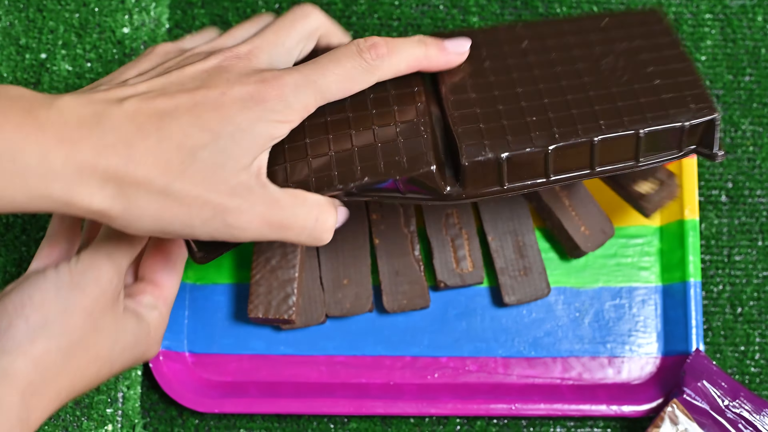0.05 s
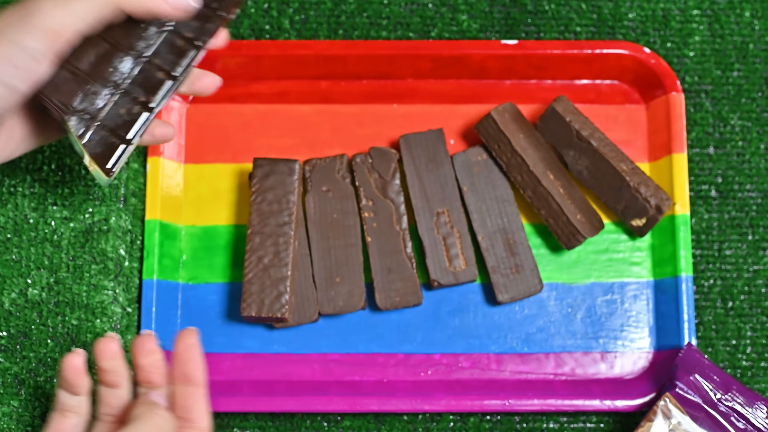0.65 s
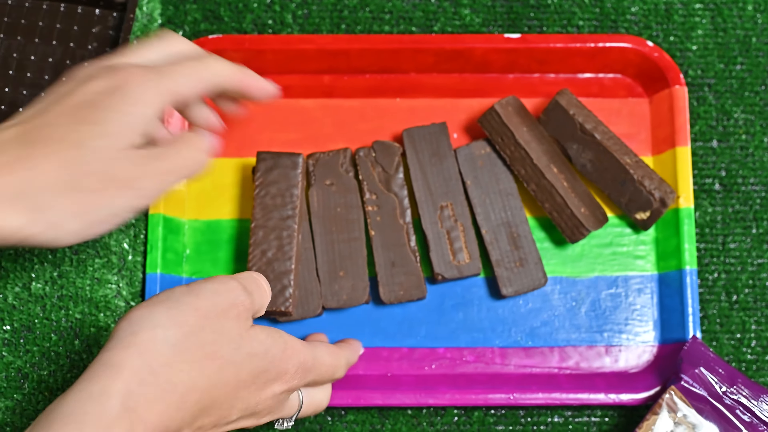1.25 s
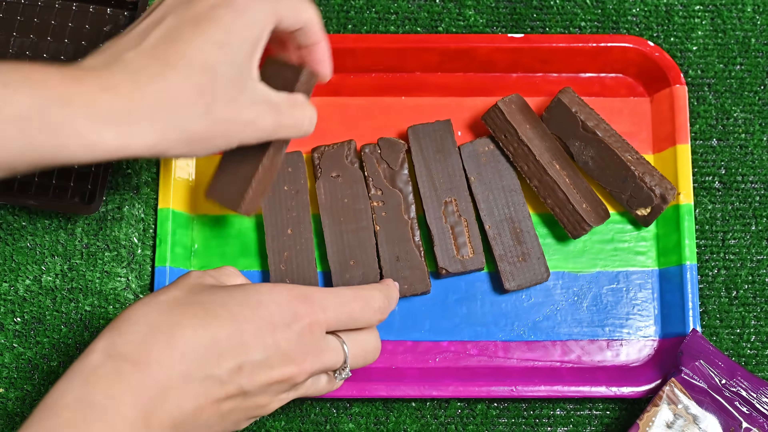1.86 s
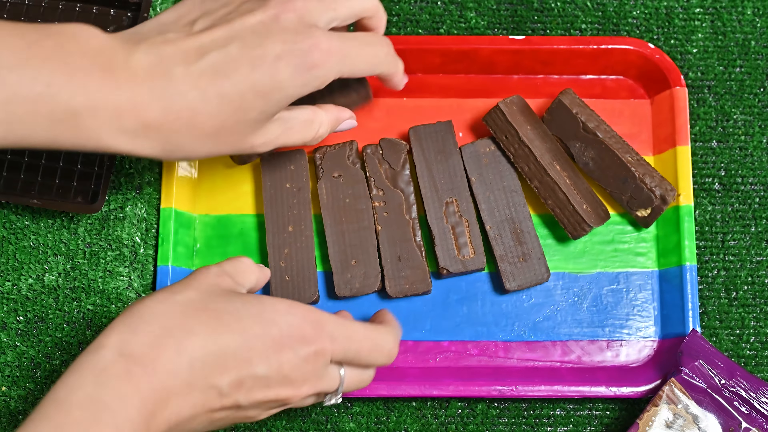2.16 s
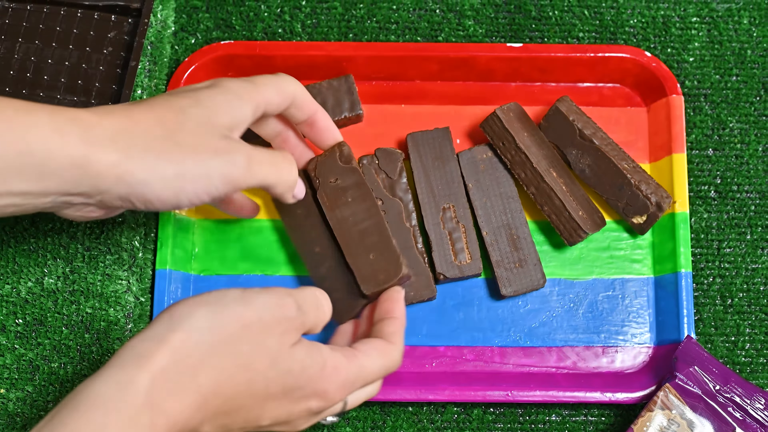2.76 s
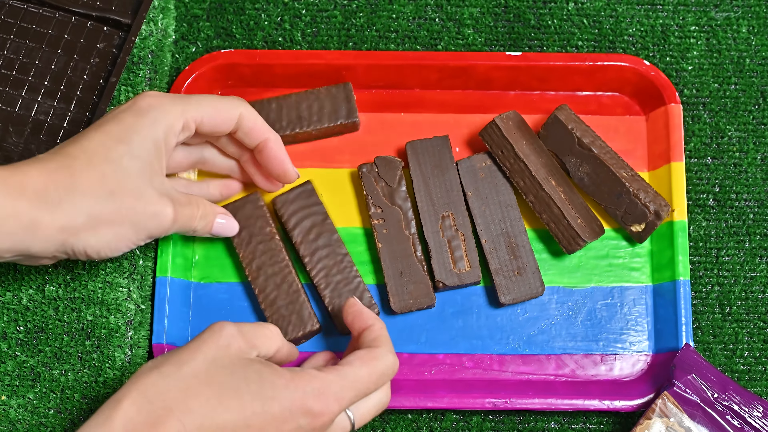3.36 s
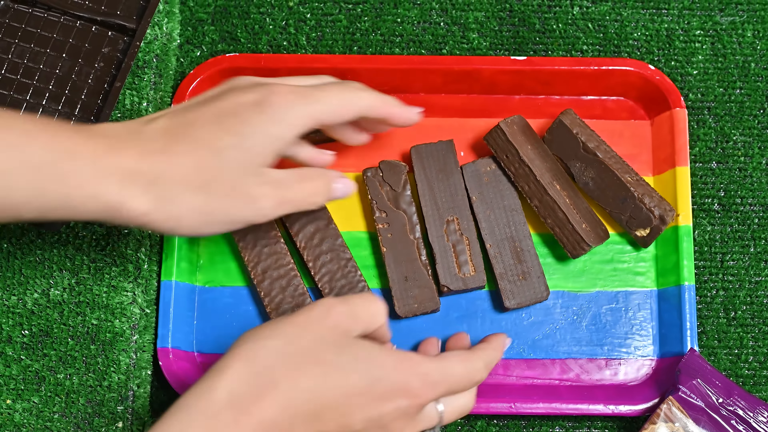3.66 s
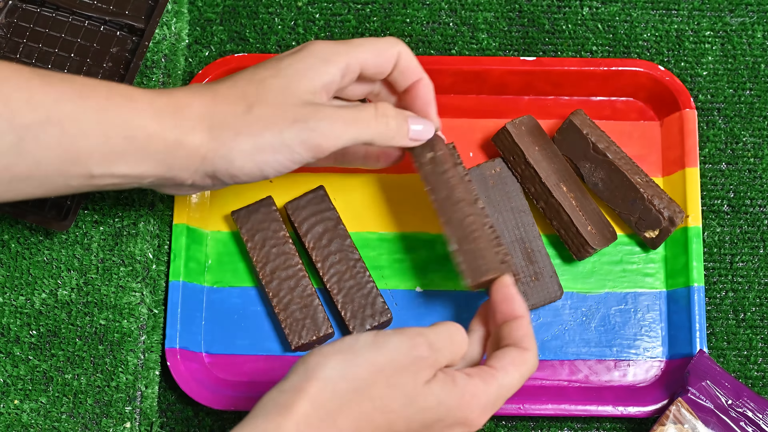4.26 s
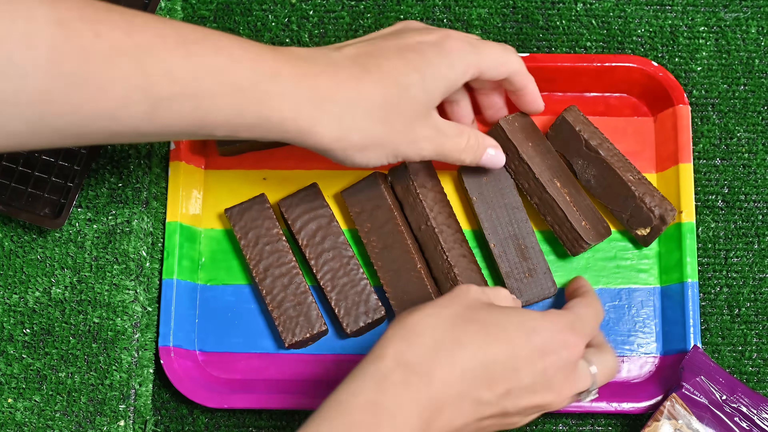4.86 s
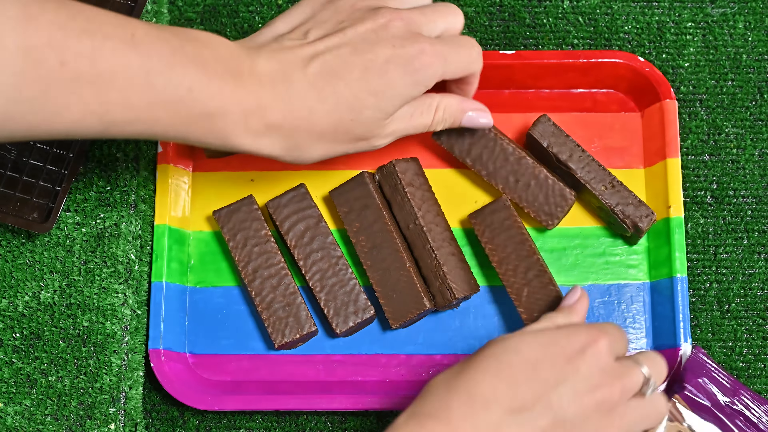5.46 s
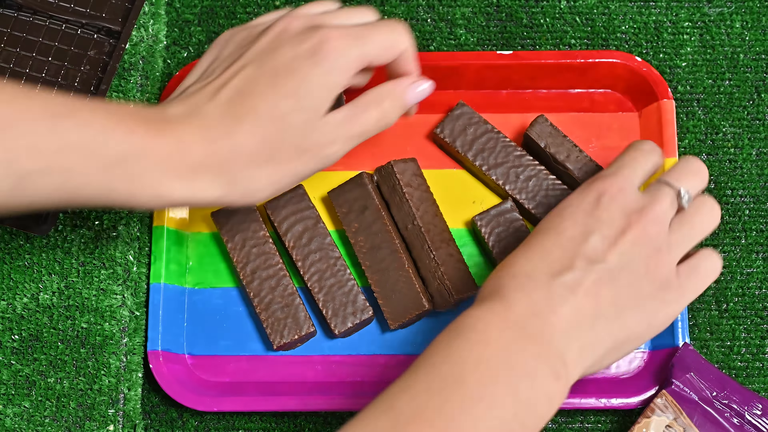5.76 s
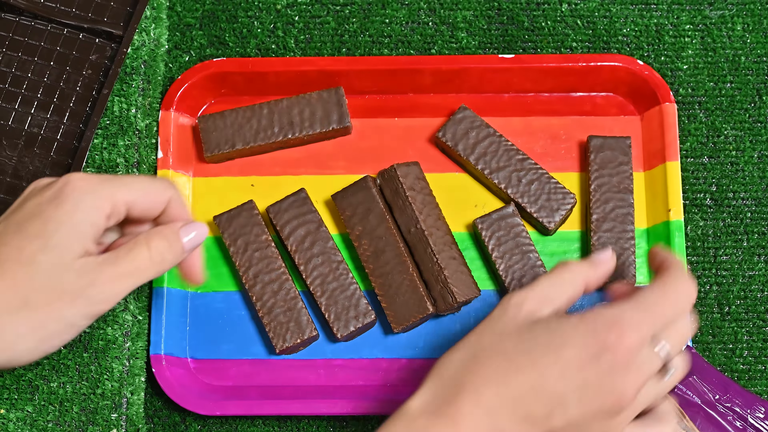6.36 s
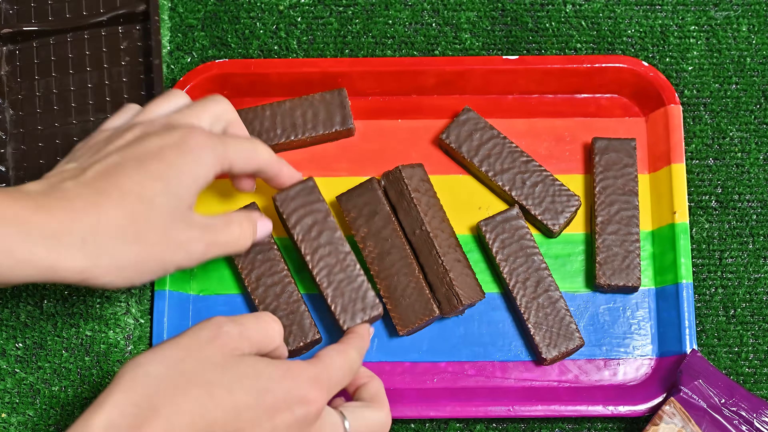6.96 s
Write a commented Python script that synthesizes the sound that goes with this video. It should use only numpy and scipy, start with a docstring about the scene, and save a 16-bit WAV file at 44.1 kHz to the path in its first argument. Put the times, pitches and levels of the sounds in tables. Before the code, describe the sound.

Close, dry knocks and light scrapes as wafer bars are turned and set down on a briefly ringing tray in a quiet room.

```python
"""A soft plastic scrape and a few sharp knocks come first: two hands lift a thin packing insert off a
serving tray and slide it onto artificial turf. Then they turn over chocolate wafer bars and set them down.
A tilted bar lands edge first and clacks flat, which makes the tray ring. Nails tick, bars and fingers
scrape in swarms of tiny slips, and a fingertip squeaks. Close stereo microphone, small quiet room."""
import sys
import numpy as np
from scipy import signal
from scipy.fft import rfft, irfft, next_fast_len
from scipy.io import wavfile
from scipy.ndimage import uniform_filter1d

SR = 44100
rng = np.random.default_rng(int(sys.argv[2]) if len(sys.argv) > 2 else 0)


def store_pcm(level_fs):
    """Save levels as 16-bit WAV."""
    pcm = np.round(np.clip(level_fs, -1, 1) * 32767).astype(np.int16)
    wavfile.write(sys.argv[1], SR, np.atleast_2d(pcm).T)


N = 309141

# A "fade" is the time a sound takes to drop by 60 dB. A "tone" table says how strong each frequency is.
# the insert drags over tray and turf: (start [s], length [s], level [dB], treble [dB])
INSERT_STROKES = [(-0.04, 0.18, -53, -5.5), (0.31, 0.12, -72.5, -3), (0.47, 0.2, -67.5, 0),
                  (0.545, 0.05, -53.5, -3.5), (0.73, 0.06, -57.5, -0.5), (0.77, 0.16, -68.5, 6.5),
                  (0.903, 0.067, -50, -2), (0.969, 0.015, -41, 5.5), (0.98, 0.044, -54.5, -1),
                  (1.034, 0.014, -46.5, -2.5), (1.044, 0.029, -40.5, -5.5), (1.085, 0.083, -52.5, -5),
                  (1.172, 0.025, -61, -6), (1.16, 0.16, -65.5, -9.5)]
# tone of the dragging insert: (frequency [Hz], level [dB])
INSERT_TONE = [(30, -16), (60, 11.5), (110, 4.5), (220, 4), (450, 3), (750, 5), (1100, 7), (1500, 6.5),
               (2200, 0.5), (4600, 0), (7000, -6), (8600, -5.5), (10300, -5), (16000, -19)]
# tone of the still room, the part both sides share: (frequency [Hz], level [dB])
HUSH_SHARED_TONE = [(12, -37), (20, -9.5), (48, 0.5), (74, -5), (104, -4), (138, -10), (222, -13),
                    (301, -14.5), (337, -16), (434, -22.5), (542, -22.5), (1610, -31), (4500, -38),
                    (9140, -40.5), (11800, -41.5), (16000, -45.5)]
# the part in which left and right differ: (frequency [Hz], level [dB])
HUSH_SIDE_TONE = [(12, -50), (20, -30), (43, -6), (60, -3.5), (104, -8.5), (130, -43), (234, -22),
                  (328, -42), (367, -22.5), (422, -42), (472, -30), (718, -39.5), (780, -36.5),
                  (1760, -44.5), (16000, -54)]
# insert and hands settle on turf and tray: (time [s], level [dB], half length [s])
SOFT_PUSHES = [(0.005, -38.5, 0.012), (0.19, -54.5, 0.02), (0.265, -60, 0.021), (0.987, -46, 0.024),
               (1.065, -45.5, 0.032), (1.17, -63.5, 0.052), (2.084, -44, 0.0097), (2.139, -49.5, 0.0086)]
# tone of those pushes: (frequency [Hz], level [dB])
PUSH_TONE = [(20, -5), (55, -11), (105, 2.5), (160, -19), (300, -13.5), (600, -25), (1200, -26),
             (16000, -70)]
# blows on the tray: (first touch [s], fall from edge to flat [s], level [dB], treble [dB], snap [dB],
# bass [dB], ring [dB], ring pitch [Hz], ring fade [s], tray body [dB], tray thump [dB])
BLOWS = [(0.0449, 0.0017, -18, -5, -5, -9, 10.5, 1110, 0.045, -0.5, 4),
         (0.1127, 0.0024, -6.5, -4.5, -5, -4, 5.5, 1080, 0.026, -6, -6),
         (0.1631, 0.001, -2.5, -7.5, -17, -3, -2, 1010, 0.025, -11, -5),
         (0.392, 0, -4.5, -7.5, -16, -7, 10, 972, 0.028, -17.5, -16.5),
         (0.4507, 0, -34.5, -3, -10, -2, 19, 1150, 0.019, -16, -15),
         (0.4755, 0, -35.5, -7, -12, -4, 17, 1310, .02, -20, -15),
         (0.574, 0, -34, -10, -12, -2, 16.5, 1016, 0.11, -15, -11),
         (1.4377, 0.00023, -16.5, 1, -7, -1, -3, 990, 0.045, -14, -6),
         (1.4435, 0.00024, -21, 0, -1, -4, 0, 1230, 0.068, -24, -4),
         (1.8006, 0.0075, -7.5, -5.5, -7.5, 1, 0, 940, 0.028, -9.5, -9),
         (1.841, 0.0021, -20.5, -11, -13, 3, 6, 743, 0.042, -7, 2),
         (2.1992, 0.0009, -9, 0, -2, -1, 4.5, 996, 0.11, -7, -7.5),
         (2.2339, 0.0035, -14.5, -10, -7, 4.5, 8, 996, 0.078, -8, 3.5),
         (2.453, 0.00027, -22, -7.5, -10, 7.5, -0.5, 1300, 0.028, -4.5, 6.5),
         (2.717, 0.0007, -39, -21, -13, 4.5, 9, 1373, 0.021, -6, 7),
         (3.314, 0.0028, -18, -3.5, -14, 3, -1.5, 1001, 0.16, -2, -0.5),
         (3.434, 0.0064, -6.5, -10, -9, 3, -2, 1225, 0.024, -8.5, -16.5),
         (3.8196, 0.00057, -19, -5, -13, -1, 3.5, 990, 0.046, -9.5, -4.5),
         (3.845, 0, -16.5, 4.5, -18, -3, -2, 994.6, 0.041, -10.5, -2.5),
         (4.072, 0.0021, -38.5, -7, -4, 0, 0, 1010, .03, -12, -9),
         (4.1564, 0.0038, -22.5, -6, 3, 1, 2, 999, 0.045, -4, 0),
         (4.3836, 0.0062, -13, -8.5, -8, 5, 3.5, 1018, 0.07, -1.5, 1.5),
         (4.455, 0.007, -9.5, -10, -12, 1, 8, 966, 0.086, -6.5, -2.5),
         (4.6026, 0, -10.5, -13, -18, 2, -3, 1057, 0.13, -5.5, -5.5),
         (5.1257, 0, -27, -3, -11, 1, -1, 1209, .03, 3, 7),
         (5.1499, 0.0018, -28, -9, -10, 2, 2, 1099, 0.036, 3, -1),
         (5.543, 0.001, -23.5, -8, -8, 5, 13.5, 988.5, 0.11, -3, 5),
         (5.5671, 0.00055, -12, -5, -5, 2.5, 7.5, 994, 0.078, -10.5, -13),
         (5.5919, 0.0024, -14.5, -6, -3, 2.5, 8, 991.6, 0.12, -1.5, 0),
         (6.131, 0.0016, -14.5, -6, -22, -4, -20, 1209, .02, -4.5, 1.5),
         (6.183, 0.0024, -21.5, -9, -12, -4, 5, 998, 0.048, -15, -8.5),
         (6.2232, 0, -13, -10, -14, -3.5, 2.5, 832.4, 0.017, -13, -0.5)]
# tone of a clack: (frequency [Hz], level [dB])
CLACK_TONE = [(25, -19), (90, -6), (300, -9.5), (450, -1), (750, 3), (1200, 7.5), (1600, 5.5), (2200, 1.5),
              (3200, -3.5), (4800, -10.5), (7000, -20.5), (9000, -22), (11000, -27), (16000, -48)]
# tone of the brittle snap that starts a contact: (frequency [Hz], level [dB])
SNAP_TONE = [(300, -41), (3000, -8), (6500, -5), (9500, 4), (12500, -3.5), (16000, -15)]
# the notes at which the tray rings on its table: (pitch [Hz], level [dB], fade [s])
TRAY_NOTES = [(57.7, -5.5, 0.37), (105.6, -2.5, 0.3), (120.3, -4.5, 0.15), (135.8, -6.5, 0.16),
              (196, -10.5, 0.045), (233.5, -8, 0.093), (276, 0.5, 0.35), (368.6, -2, 0.092),
              (469, -9.5, 0.03), (508, -14.5, 0.073), (684, -18.5, 0.12), (768.5, -13, 0.12),
              (854, -21, 0.14), (932, -17.5, 0.0546), (1003, -15.5, 0.096), (1102, -13, 0.0776)]
# the close pitches that make up a hollow note: (pitch [ratio], level [dB])
HOLLOW_CLUSTER = [(0.935, -11), (1.001, 2.5), (1.055, -10)]
# a hard blow also rings the piece that lands: (time [s], level [dB], pitch [Hz], fade [s])
PIECE_RINGS = [(0.1165, -6, 1286, 0.032), (0.1634, -11, 3200, 0.023), (0.393, -13, 2510, .016),
               (0.3974, -19, 4650, 0.023), (1.8075, -6.5, 2310, 0.018), (2.2006, -9.5, 1970, 0.021),
               (2.234, -22, 2870, .03), (3.4415, -12.5, 1879, 0.036), (4.4609, -19, 2580, 0.043),
               (4.6027, -18.5, 1400, 0.013), (5.567, -12, 1280, 0.013), (5.592, -18, 1750, .02),
               (6.027, -26, 2780, 0.017), (6.2234, -25, 3380, .02)]
# tray and insert bounce on the turf: (time [s], level [dB], pitch [Hz], fade [s])
BOUNCES = [(0.1632, -22, 119, 0.094), (0.239, -37, 89.5, 0.37), (0.978, -39, 158, .07),
           (0.999, -38, 270, 0.051), (1.021, -38.5, 185, 0.069), (2.454, -47.5, 126, 0.079),
           (4.389, -39.5, 100, 0.072), (4.453, -42, 87, 0.1), (4.463, -40, 214.8, .05),
           (6.026, -37.5, 132, 0.049), (6.131, -32, 108.9, 0.13), (6.132, -31.5, 206.9, 0.075),
           (6.223, -39, 99.95, .17)]
# nails and crisp edges tap: (time [s], level [dB], treble [dB], pitch [Hz], left over right [dB])
LIGHT_TAPS = [(0.2074, -24, -4, 1120, -1), (0.684, -42, -10, 1280, -2.5), (0.933, -28, -10, 1500, -2),
              (1.318, -41, 4.5, 3900, -1), (1.4068, -18, 3, 1150, -0.5), (1.4648, -25.5, -10, 1490, -2),
              (1.6063, -40, 4.5, 2250, -2), (2.0733, -33.5, -1, 4030, 8), (2.0806, -19.5, -3, 3880, -3.5),
              (2.1313, -18.5, 2.5, 2567, -1.5), (2.297, -30, -8, 1129, -2), (3.087, -52, 14, 1110, -1),
              (4.707, -34, -5, 1307, 0), (4.851, -25, 5.5, 1820, -1.5), (4.8596, -28.5, -1, 1500, -1),
              (4.903, -36, 4.5, 1750, -2), (5.4361, -33.5, 4, 1600, -1), (5.492, -46, 10, 1596, 5),
              (5.518, -31, 4.5, 5660, 4), (5.5237, -26, 3, 1310, 1), (5.663, -24.5, 1, 1130, 1),
              (6.0261, -21.5, -6, 1190, -1.5), (6.835, -35, -3, 2000, -1.5), (6.9949, -34.5, 0.5, 2920, -3)]
# tone of those taps: (frequency [Hz], level [dB])
TAP_TONE = [(60, -21), (300, -3), (900, 8.5), (2000, 7), (3500, 5), (5500, -1.5), (7500, -9.5), (9500, -8),
            (12000, -16.5), (16000, -24)]
# bars and fingers scrape: (start [s], length [s], level [dB], treble [dB])
BAR_STROKES = [(1.45, 0.061, -58, -17), (1.52, 0.12, -65.5, -4), (1.6, 0.056, -82.5, -1),
               (1.66, 0.11, -67.5, -3.5), (2.14, 0.053, -78, -3), (2.345, 0.065, -59.5, -8),
               (2.385, 0.072, -57.5, 0), (2.46, .11, -72.5, 6), (2.57, 0.08, -66, -4),
               (2.63, 0.068, -72.5, -5), (3.1, 0.077, -60, -6), (3.15, 0.13, -55, -3),
               (3.26, 0.059, -60, -1), (3.33, 0.17, -63.5, -5.5), (3.86, 0.17, -67.5, -1),
               (4.74, 0.17, -69, -8), (4.865, 0.095, -66, -3), (4.96, 0.065, -65, -5.5),
               (5.01, 0.082, -61.5, -4.5), (5.09, 0.092, -67.5, 1), (5.26, 0.11, -64.5, -2.5),
               (5.345, 0.07, -57.5, 0.5), (5.47, 0.12, -63, 2.5), (5.66, 0.059, -58.5, 0.5),
               (5.86, 0.058, -63, -3), (5.905, 0.063, -58.5, -1.5), (6.133, 0.057, -52, -4),
               (6.586, 0.03, -59.5, -6), (6.6, 0.096, -65, 0), (6.652, 0.042, -59, 0),
               (6.67, 0.33, -51.5, -6.5), (6.704, 0.01, -52, -4), (6.736, 0.023, -58.5, 4.5),
               (6.758, 0.014, -58, 4), (6.785, 0.072, -62, 2), (6.873, 0.014, -56.5, -4)]
# tone of that scraping: (frequency [Hz], level [dB])
BAR_TONE = [(30, -24), (100, 4.5), (280, -3), (420, 2), (900, 7), (1800, 7.5), (3200, 3.5), (5000, -1.5),
            (7000, -11), (9500, -9), (12000, -14.5), (16000, -24)]
# a fingertip squeaks on chocolate: (time [s], level [dB], pitch [Hz], half length [s])
FINGER_SQUEAKS = [(1.608, -60.5, 2220, 0.0075), (5.941, -55.5, 2670, 0.014), (6.67, -58, 790, 0.023)]
# how far the microphone's left side runs ahead of its right: (frequency [Hz], lead [radians])
LEFT_LEAD = [(0, -0.87), (300, 0.4), (3000, 0.62), (6000, -0.62), (8500, -1.04), (13000, -1.42)]
# tone of what the microphone's housing scatters: (frequency [Hz], level [dB])
HOUSING_TONE = [(30, -9), (130, -4.5), (500, -19), (1200, -31), (4000, -11), (8000, -11.5), (14000, -18)]
# tone of the dull echo from the nearest wall: (frequency [Hz], level [dB])
WALL_TONE = [(100, -20), (500, -14), (1000, -11), (1800, -20), (5000, -20.5), (14000, -33)]
# how long the room's echoes last: (frequency [Hz], fade [s])
ROOM_FADES = [(80, 0.9), (260, 0.28), (900, 0.42), (2000, 0.31), (5000, 0.34), (14000, 0.2)]
# tone of those echoes: (frequency [Hz], level [dB])
ECHO_TONE = [(100, 3.5), (600, 4.0), (1000, 0.6), (1500, -0.4), (3000, -1.5), (10000, -3.5)]


def amp(db):
    """Turns decibels into a number to multiply by."""
    return 10 ** (np.asarray(db) / 20)


def unit(x):
    """Scales a sound to an energy of one."""
    return x / np.sqrt(np.sum(x ** 2) + 1e-20)


def read(points, hz):
    """Looks up values between (frequency, value) points, on a logarithmic frequency scale."""
    f, value = np.transpose(points)
    return np.interp(np.log(hz + 1), np.log(f + 1), value)


def pan(left_db):
    """Left and right gains that make the left side louder by left_db."""
    return amp([[left_db / 2], [-left_db / 2]])


def add(mix, s, sound, pan_db):
    """Places a sound at a time and between left and right."""
    part = mix[:, max(round(s * SR), 0):][:, :len(sound)]
    part += pan(pan_db) * sound[:part.shape[1]]


def colour(x, tone, size=4096):
    """Filters a sound to the given tone, without letting anything sound early."""
    log_gain = np.log(amp(read(tone, abs(np.fft.fftfreq(size, 1 / SR)))))
    taps = np.fft.ifft(np.exp(np.conj(signal.hilbert(log_gain)))).real
    return signal.fftconvolve(x, taps[:size // 2])[:len(x)]


def split(x):
    """Splits a sound into body and treble, each brought to a standard strength."""
    body, treble, middle = (signal.sosfilt(signal.butter(3, hz, kind, fs=SR, output="sos"), x)
                            for hz, kind in ((5300, "low"), (5300, "high"), ([1300, 4500], "band")))
    return body / np.linalg.norm(middle), unit(treble)


def wobble(length, smooth):
    """A random wander of about size one, smoothed over `smooth` samples."""
    return np.sqrt(length) * unit(uniform_filter1d(rng.standard_normal(length), smooth))


def swell(s, db, half_s):
    """A smooth rise and fall of level around a moment."""
    return amp(db) * np.exp(-np.minimum(((np.arange(N) / SR - s) / half_s) ** 2, 50))


def struck(t, rise_s, fade_s):
    """The level of something struck: it rises quickly, then dies away."""
    return amp(-60 * t / fade_s) * (1 - np.exp(-t / rise_s))


def arch(start, length, crest):
    """The speed of a stroke: from rest to a peak at the share `crest` of its length, and back."""
    rise = np.interp(np.arange(N) / SR, start + length * np.array([0, crest, 1]), [0, 1, 0])
    return np.sin(np.pi / 2 * rise) ** 0.99


def shifting(x, depth_db):
    """Narrow bands of sound come and go as the place of contact moves."""
    spectrum = signal.stft(x, nperseg=256, noverlap=192)[2]
    patches = uniform_filter1d(rng.standard_normal(spectrum.T.shape).T, 14, axis=1)  # smooth in time
    patches = uniform_filter1d(patches, 2, axis=0)  # and in frequency
    return signal.istft(spectrum * amp(depth_db * patches / patches.std()), nperseg=256, noverlap=192)[1][:N]


def rub(strokes, tone, crest, slips_per_s, spread_db, hiss_db, patchy_db, grip_db=2, grip_hz=69.5):
    """Rubbing: a swarm of tiny, uneven slips over a fine hiss, while the hand's pressure wavers."""
    sizes = amp(spread_db * np.minimum(rng.exponential(1, N), 4)) * rng.choice([-1, 1], N)
    slips = unit(sizes * (rng.random(N) < slips_per_s / SR))
    hiss = amp(hiss_db) * unit(rng.standard_normal(N))
    body, treble = split(colour(shifting(slips + hiss, patchy_db), tone))
    pressure = np.interp(np.arange(N) / SR * 2 * grip_hz, np.arange(N), rng.standard_normal(N))
    sound = sum(amp(db) * arch(start, length, crest) * (body + amp(treble_db) * treble)
                for start, length, db, treble_db in strokes)
    return np.sqrt(N) * amp(grip_db * pressure) * sound


def insert_slides():
    """The thin plastic insert catches and slips as it drags over tray and turf."""
    return pan(-1.7) * rub(INSERT_STROKES, INSERT_TONE, crest=0.28, slips_per_s=3500,
                           spread_db=1.5, hiss_db=-4.5, patchy_db=2.5)


def hush():
    """Low rumble and faint hiss of the still room."""
    hz = np.fft.rfftfreq(N, 1 / SR)
    layers = []
    for tone, db in ((HUSH_SHARED_TONE, -60), (HUSH_SIDE_TONE, -55)):
        noise = irfft(rfft(rng.standard_normal(N)) * amp(read(tone, hz)), N)
        layers.append(amp(db) * np.sqrt(N) * unit(noise))
    shared, side = layers
    return np.array([shared + side, shared - side])


def bumps():
    """Soft, dull pushes reach the table through the turf."""
    rumble = np.sqrt(N) * unit(colour(rng.standard_normal(N), PUSH_TONE))
    return sum(swell(*push) for push in SOFT_PUSHES) * rumble


def evened(x, width_hz=300, top_hz=2500):
    """Irons out broad chance peaks below top_hz, so that all blows sound like the same tray."""
    hz = np.fft.rfftfreq(len(x), 1 / SR)
    power = uniform_filter1d(abs(rfft(x)) ** 2, int(width_hz / hz[1]))
    excess_db = 10 * np.log10(power / power.mean())
    return colour(x, np.c_[hz, -excess_db / (1 + (hz / top_hz) ** 2)])


def contact(tone, treble_db, snap_db, bass_db, shiver_db, fade_s, treble_life_s):
    """Two things meet: one sharp kick with a brittle snap, then a quickly dying shiver."""
    t = np.arange(SR // 10) / SR
    kick = -signal.unit_impulse(len(t))
    shiver = amp(shiver_db) * unit(rng.standard_normal(len(t)) * amp(-60 * t / fade_s))
    drive = colour(evened(kick + shiver), [(650, bass_db), (1200, 0.015)])
    body, treble = split(colour(drive, tone))
    snap = amp(snap_db) * unit(colour(kick, SNAP_TONE))
    treble = unit(unit(treble * np.exp(-t / treble_life_s)) + snap)
    return body + amp(treble_db) * treble


def tray_ring(upper_db, body_db, thump_db, detune=0.009):
    """The struck tray rings at many notes at once, each slightly off pitch from blow to blow."""
    t = np.arange(SR // 2) / SR
    push = [(130, thump_db), (275, body_db), (800, upper_db)]
    out = np.zeros(len(t))
    for hz, db, fade_s in TRAY_NOTES:
        shift, direction = rng.standard_normal(3)[1:]
        note = np.sin(2 * np.pi * hz * (1 + detune * shift) * t) * struck(t, 0.0016, fade_s)
        out += np.sign(direction) * amp(db + read(push, hz)) * unit(note)
    return out


def knocks(edge_db=-4, rebound_db=-3.5, tray_db=-2.5, pan_db=-0.5):
    """The insert and the bars strike the tray: a dry clack, and the tray rings."""
    out = np.zeros((2, N))
    for s, fall, db, treble_db, snap_db, bass_db, ring_db, _, _, body_db, thump_db in BLOWS:
        touches = [(fall, 0)]
        if fall > 0.001:  # a tilted piece touches edge first, falls flat, then rebounds
            touches += [(0, edge_db), (1.52 * fall, rebound_db)]
        for delay, touch_db in touches:
            clack = contact(CLACK_TONE, treble_db, snap_db, bass_db,
                            shiver_db=6, fade_s=0.029, treble_life_s=0.022)
            add(out, s + delay, amp(db + touch_db) * clack, pan_db)
        upper_db = 1.4 + 0.4 * ring_db  # the tray's high notes partly follow the hollow ring
        add(out, s + fall, amp(db + tray_db) * tray_ring(upper_db, body_db, thump_db), pan_db)
    return out


def hollow_note(hz, fade_s, rattle=0.26):
    """A short, hollow note: close pitches throb together, and the loose piece roughens them."""
    t = np.arange(SR // 10) / SR
    shake = 1 + rattle * wobble(len(t), smooth=70)
    cluster = sum(amp(db) * np.sin(2 * np.pi * hz * ratio * t) for ratio, db in HOLLOW_CLUSTER)
    return unit(-cluster * shake * struck(t, 0.00022, fade_s))


def hollow_rings(level_db=-4):
    """Each blow sounds a hollow note as the piece comes flat against the tray."""
    out = np.zeros((2, N))
    for s, fall, db, _, _, _, ring_db, hz, fade_s, _, _ in BLOWS:
        add(out, s + fall, amp(db + ring_db + level_db) * hollow_note(hz, fade_s), pan_db=-2.5)
    return out


def piece_rings():
    """A bar or the insert that lands hard rings too, briefly and higher than the tray."""
    out = np.zeros((2, N))
    for s, db, hz, fade_s in PIECE_RINGS:
        add(out, s, amp(db) * hollow_note(hz, fade_s), pan_db=-1.5)
    return out


def thuds(rattle=0.18):
    """A heavy blow makes the thin plastic floor bounce on the turf in deep, dying swings."""
    out = np.zeros((2, N))
    t = np.arange(SR // 2) / SR
    for s, db, hz, fade_s in BOUNCES:
        swing = np.sin(2 * np.pi * hz * t) * (1 + rattle * wobble(len(t), smooth=200))
        add(out, s, amp(db) * swing * struck(t, 0.0029, fade_s), pan_db=0)
    return out


def ticks(note_db=-2):
    """Nails and wafer edges tap too lightly to move the tray: a bright click with a brief note."""
    out = np.zeros((2, N))
    for s, db, treble_db, hz, pan_db in LIGHT_TAPS:
        click = contact(TAP_TONE, treble_db, snap_db=-16, bass_db=-1,
                        shiver_db=6.5, fade_s=0.033, treble_life_s=0.006)
        note = amp(note_db) * hollow_note(hz, fade_s=0.014)
        add(out, s, amp(db) * (click + note), pan_db)
    return out


def bar_scrapes():
    """Bars and fingers scrape, with fewer and more uneven slips than the insert."""
    return pan(-1.5) * rub(BAR_STROKES, BAR_TONE, crest=0.29, slips_per_s=3000,
                           spread_db=3.5, hiss_db=-3, patchy_db=3.5)


def squeaks(waver=0.062):
    """A fingertip sticks and slips on chocolate, making brief, unsteady tones."""
    uneven_time = np.cumsum(1 + waver * wobble(N, smooth=60)) / SR
    return sum(swell(s, db, half_s) * np.sqrt(2) * np.sin(2 * np.pi * hz * uneven_time)
               for s, db, hz, half_s in FINGER_SQUEAKS)


def microphone(x):
    """Sound reaches the microphone's two sides slightly out of step and scatters off its housing."""
    size = next_fast_len(N + SR // 10)
    lead = read(LEFT_LEAD, np.fft.rfftfreq(size, 1 / SR))
    direct = irfft(rfft(x, size) * np.exp(.5j * np.array([lead, -lead])), size)[:, :N]
    scatter = irfft(np.exp(2j * np.pi * rng.random(180)))  # a smear of about 8 ms
    side = colour(signal.oaconvolve(x.mean(0), scatter)[:N], HOUSING_TONE)
    return direct + np.array([side, -side])


def echoes(shared=0.46, build_s=0.006):
    """Scattered wall echoes, partly alike on both sides; each frequency dies at its own speed."""
    count = SR // 32
    slots = np.zeros((3, count, 16))  # one echo somewhere in every 16 samples
    places = rng.integers(0, 16, (3, count, 1))
    np.put_along_axis(slots, places, rng.choice([-1., 1.], places.shape), 2)
    left, right, both = slots.reshape(3, -1)
    taps = np.sqrt(shared) * both + np.sqrt(1 - shared) * np.array([left, right])
    hz, t, spectrum = signal.stft(taps, SR, nperseg=256)
    tail = signal.istft(spectrum * amp(-60 * t / read(ROOM_FADES, hz)[:, None]), SR, nperseg=256)[1]
    tail *= 1 - np.exp(-(np.arange(tail.shape[1]) / SR / build_s) ** 2)
    return np.array([colour(unit(side), ECHO_TONE) for side in tail])


def room(x, tail_db=-11, wall_delay_s=0.012, patterns=6):
    """One echo from the nearest wall, and a tail whose pattern changes as the hands move about."""
    place = np.linspace(0, patterns - 1, N)
    shares = (np.sqrt(np.maximum(1 - abs(place - k), 0)) for k in range(patterns))
    out = amp(tail_db) * sum(signal.oaconvolve(x * share, echoes(), axes=1)[:, :N] for share in shares)
    add(out, wall_delay_s, colour(x.mean(0), WALL_TONE), pan_db=0)
    return out


def scene():
    """Scrapes, blows and ticks on the table, heard up close in the quiet room."""
    handling = insert_slides() + bar_scrapes() + knocks() + ticks() + squeaks() + bumps()
    rings = hollow_rings()
    direct = microphone(handling + rings + piece_rings() + thuds())
    # the hollow rings aim up at the microphone, so a little less of them reaches the walls
    return direct + room(handling + amp(-0.5) * rings) + hush()


def record(dry, top_hz=16450):
    """Cuts away the very highest treble."""
    low_pass = signal.firwin(255, top_hz, window=("kaiser", 9), fs=SR)
    return signal.oaconvolve(dry, low_pass[None], "same")


dry = scene()
out = record(dry)
store_pcm(out)
```